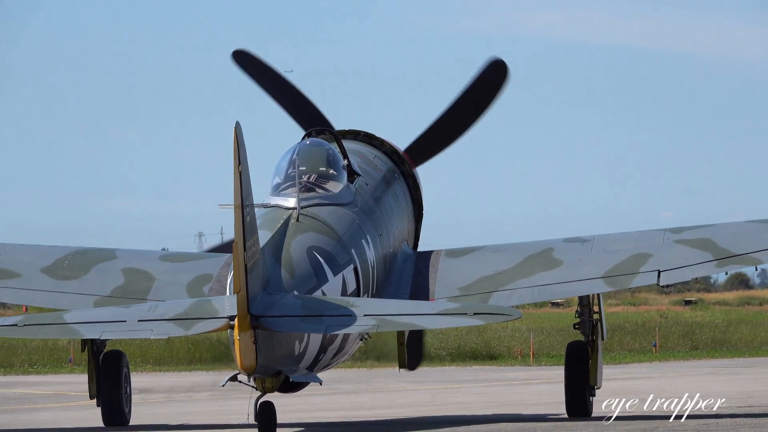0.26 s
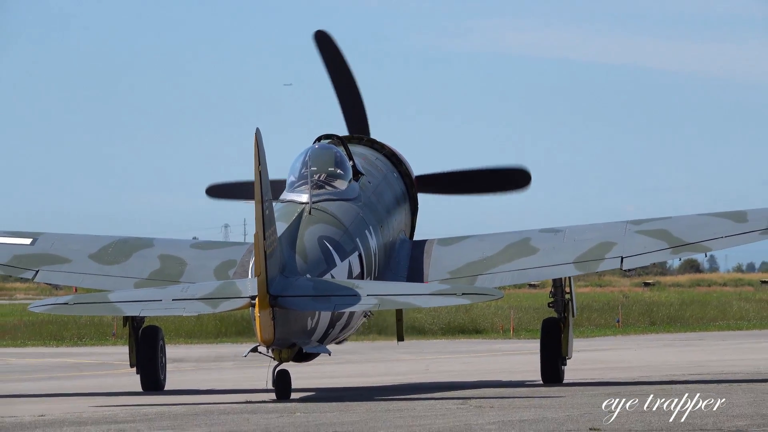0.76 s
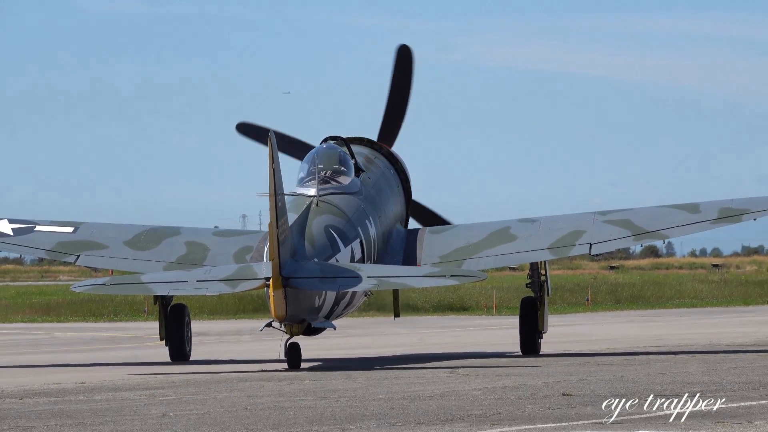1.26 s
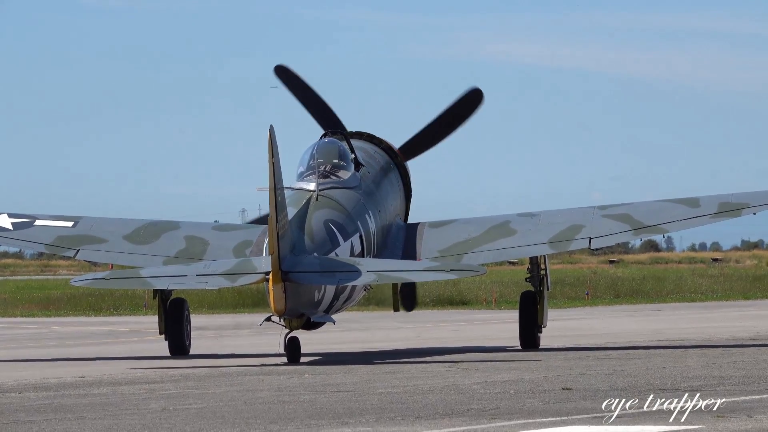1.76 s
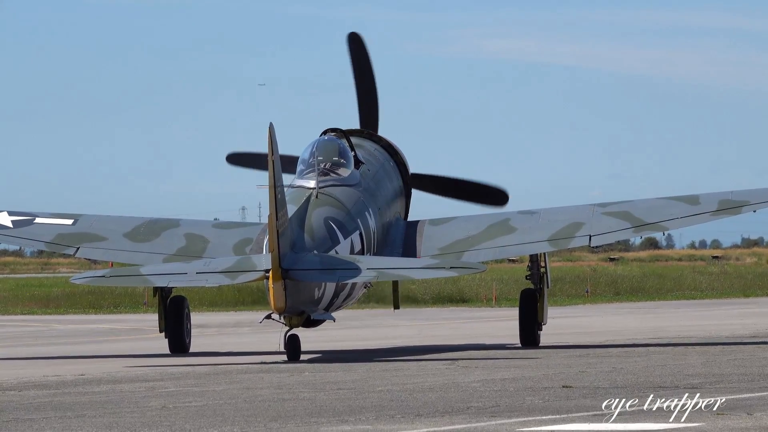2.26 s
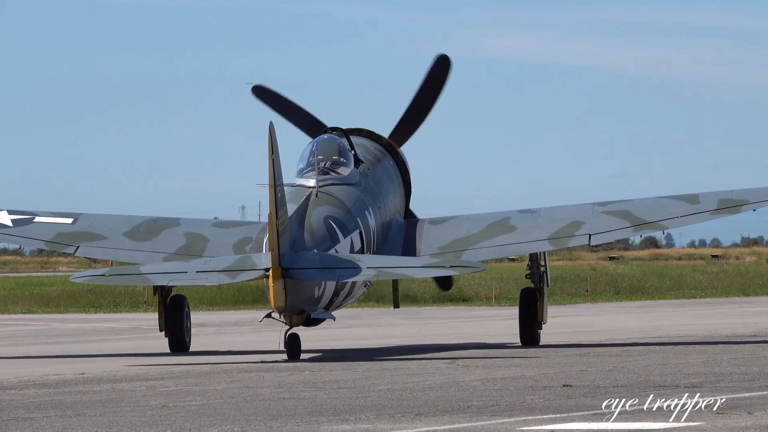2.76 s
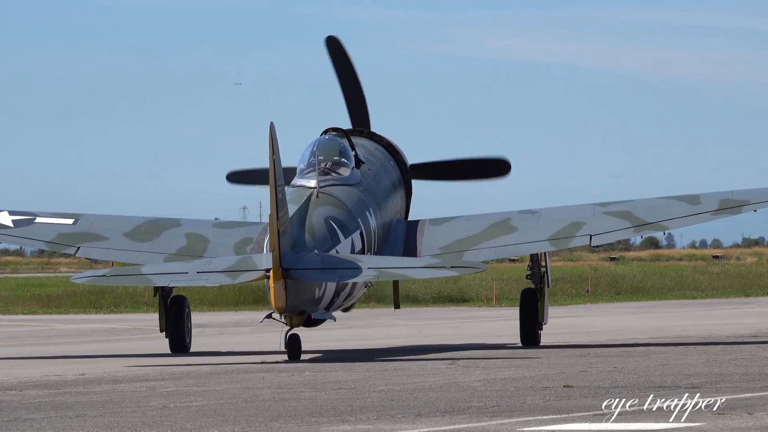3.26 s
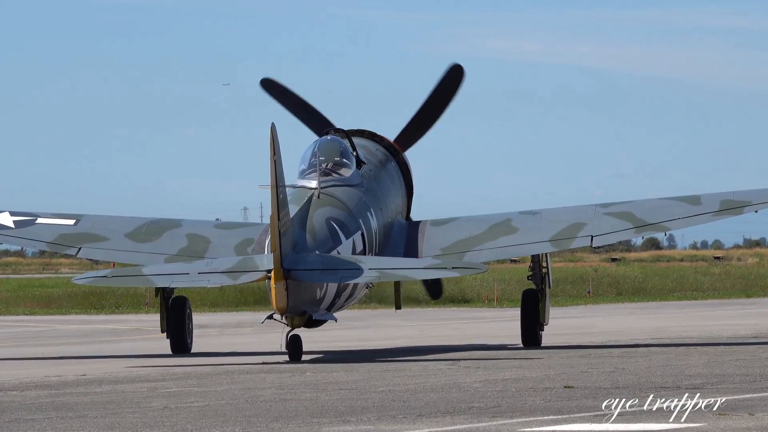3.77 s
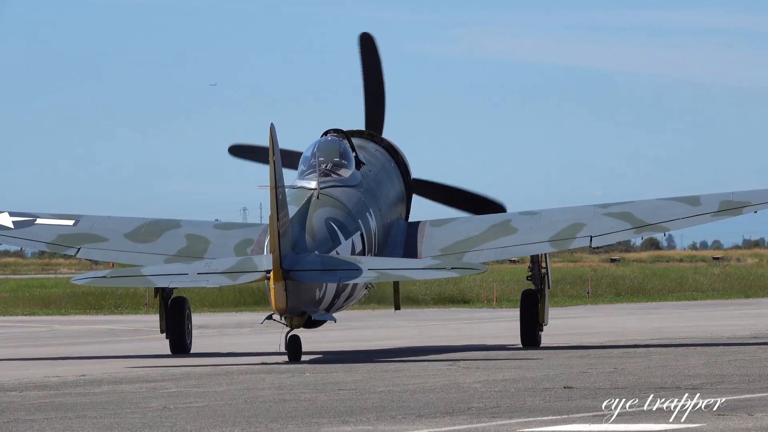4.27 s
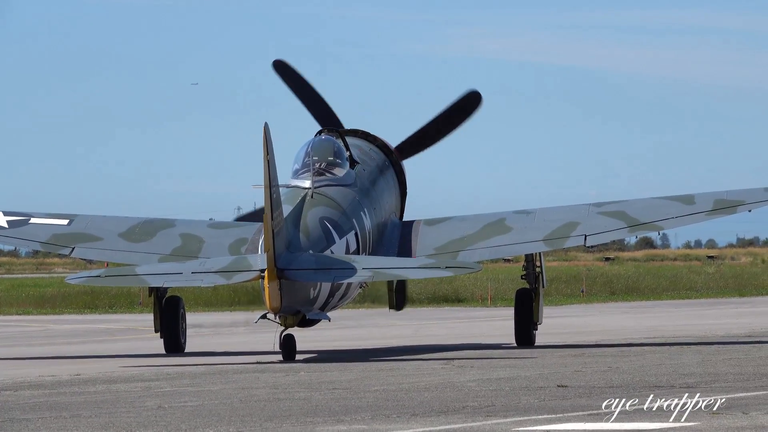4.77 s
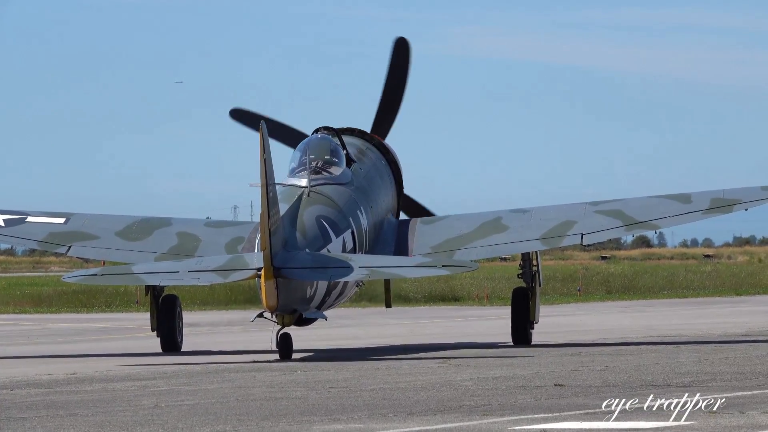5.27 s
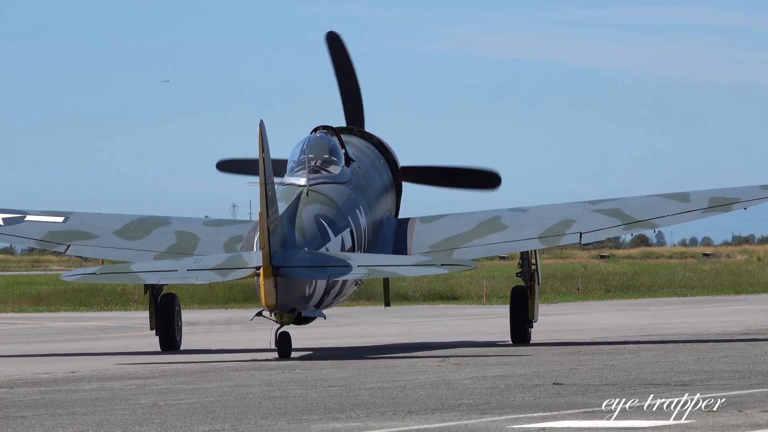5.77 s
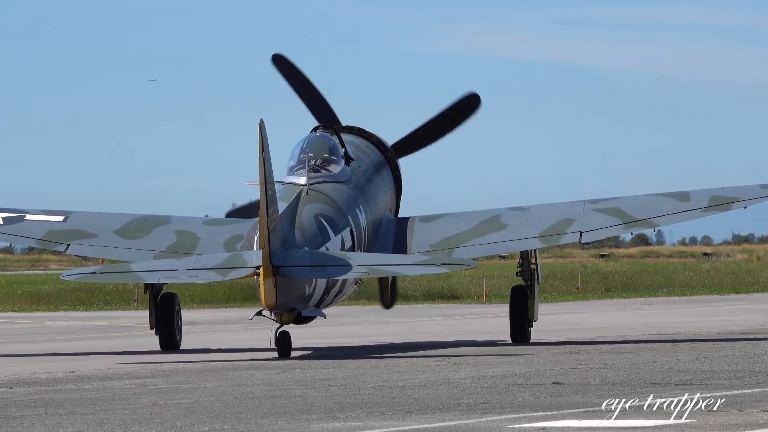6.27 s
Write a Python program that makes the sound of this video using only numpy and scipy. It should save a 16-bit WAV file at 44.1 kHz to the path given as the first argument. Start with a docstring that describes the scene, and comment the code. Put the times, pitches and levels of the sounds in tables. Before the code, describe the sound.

Two radial piston aircraft engines idle steadily on an open airfield ramp, heard from behind. One chugs hard and unevenly, each beat a crack followed by a hollow pipe thump; the other spits rapid, breathy puffs of hiss. A blurred, throbbing roar fills in below. Propeller wash buffets a nearly mono microphone with low heaves and flutter, and the strongest gusts abruptly mute everything for tiny moments.

```python
"""A hard, uneven chugging and rapid hissy puffs over a blurred roar, heavily buffeted and often cut off.
Two radial piston aircraft engines idle on an open ramp, heard from behind in the propeller wash.
One engine's firings excite the modes of its exhaust pipe; the other's spit jets of turbulent hiss.
Weaker firings form the throbbing roar, and turbulent wash presses on a near-mono microphone.
The strongest gusts pin its input and all but mute everything for a moment."""
import sys
import numpy as np
from scipy import signal
from scipy.fft import rfft, irfft, next_fast_len
from scipy.io import wavfile
from scipy.ndimage import uniform_filter1d

SR = 44100
rng = np.random.default_rng(int(sys.argv[2]) if len(sys.argv) > 2 else 0)


def generate_wav(signal):
    """Clip the signal to [-1, 1] and save it as 16-bit WAV at the path in sys.argv[1]."""
    frames = np.transpose(np.atleast_2d(signal))
    scaled = np.clip(frames, -1, 1) * 32767
    pcm = np.round(scaled).astype(np.int16)
    wavfile.write(sys.argv[1], SR, pcm)


N = 287973  # samples

# The first engine fires nine times a cycle; two firings, four and five steps apart, arrive as loud chugs,
# each a crack and then a thump. Nominal levels, before the trims of each source:
# crack_peak_s, crack_level_db, crack_ring_hz, thump_level_db, thump_ring_hz
CHUG_EVENTS = [(0.0271, -33, 1215, -32.5, 314), (0.0938, -34, 1220, -29, 303),
               (0.1786, -32.5, 809, -30, 850), (0.2473, -36, 1914, -33.5, 308),
               (0.3272, -37, 1940, -53, 303), (0.3931, -29.5, 1256, -33, 308),
               (0.4768, -36.5, 809, -27.5, 306), (0.5452, -28.5, 1930, -45, 809),
               (0.6252, -40, 800, -57, 395), (0.6923, -28.5, 2383, -27.5, 294),
               (0.7751, -34.5, 1284, -30.5, 289), (0.8435, -30, 795, -34, 306), (0.926, -36, 830, -57, 820),
               (0.9942, -32, 809, -35, 312), (1.0744, -33, 1210, -28, 296), (1.1409, -33, 2236, -29.5, 302),
               (1.2226, -32.5, 800, -48, 394), (1.2894, -30, 2680, -27, 817),
               (1.3727, -31, 1233, -23.5, 310), (1.439, -28, 2940, -32.5, 308),
               (1.5458, -49, 1680, -38, 1574), (1.668, -38.5, 1330, -26.5, 312),
               (1.7393, -32, 1290, -31, 306), (1.8221, -31, 820, -49, 820), (1.8868, -28, 825, -31.5, 303),
               (2.042, -63, 816, -33.5, 403), (2.118, -39.5, 2760, -59, 640),
               (2.1868, -34, 2733, -34.5, 399), (2.2694, -33.5, 2810, -25, 293),
               (2.3363, -33.5, 2260, -32, 820), (2.419, -35, 1290, -48, 399),
               (2.4869, -29.5, 1230, -29, 308), (2.5707, -40, 2750, -28, 292),
               (2.6402, -31.5, 1933, -39, 815), (2.7212, -39, 794, -40, 297),
               (2.788, -32.5, 840, -32.5, 308), (2.9405, -31.5, 830, -47, 830),
               (3.02, -40.5, 1950, -45, 306), (3.0898, -37.5, 3020, -32, 303),
               (3.1708, -32.5, 2800, -32, 304), (3.2385, -28.5, 1950, -30, 300),
               (3.3217, -37, 2310, -38, 300), (3.391, -32, 2980, -32.5, 297), (3.4702, -43, 3030, -32, 403),
               (3.5446, -57, 809, -37, 397), (3.6233, -33.5, 2760, -47, 399), (3.6927, -30, 2320, -40, 304),
               (3.7722, -38, 844, -60, 399), (3.8475, -39, 1280, -60, 306), (3.925, -60, 809, -30.5, 397),
               (3.994, -32.5, 2215, -31, 304), (4.0752, -34.5, 2190, -30, 397),
               (4.1433, -36.5, 2170, -60, 306), (4.2276, -32.5, 1980, -34.5, 794),
               (4.3786, -33.5, 1200, -32, 313), (4.4449, -39, 1250, -29, 832), (4.5305, -29, 803, -36, 306),
               (4.603, -38, 800, -33, 296), (4.683, -31, 809, -32, 395), (4.7497, -26.5, 3040, -24, 306),
               (4.8329, -33, 3140, -31.5, 785), (4.898, -29, 790, -26, 315), (4.9817, -33, 780, -36.5, 399),
               (5.1322, -40, 1940, -33.5, 310), (5.2035, -32, 1885, -38, 302),
               (5.284, -33.5, 1580, -32, 300), (5.3528, -30.5, 1896, -28.5, 615),
               (5.4422, -35, 823, -38, 809), (5.5037, -30.5, 1940, -30.5, 775),
               (5.5857, -34.5, 2720, -26.5, 304), (5.6549, -31, 1930, -28, 310),
               (5.7383, -36, 2000, -46, 790), (5.805, -31.5, 2360, -30.5, 410),
               (5.8885, -31, 800, -29.5, 300), (5.9575, -32.5, 2990, -31, 310),
               (6.04, -30.5, 2690, -38, 820), (6.1086, -27.5, 3050, -28.5, 399),
               (6.192, -31.5, 3040, -28, 303), (6.2627, -32, 1230, -47, 800), (6.3448, -33, 2000, -48, 395),
               (6.4167, -60, 809, -27, 870), (6.4972, -27.5, 2378, -29, 330)]
# Gusts that pin the microphone input: start_s, length_ms, swing (signed, relative, sets the ramp into the limit)
PINNING_GUSTS = [(0.0507, 1.8, 0.09), (0.0745, 9.2, -0.27), (0.1214, 4.1, 0.09), (0.1546, 2.7, -0.1),
                 (0.192, 55.3, -0.13), (0.2628, 40.8, -0.16), (0.4277, 41.8, -0.08), (0.4977, 12.0, 0.11),
                 (1.2958, 4.8, 0.07), (1.4916, 54.3, 0.22), (1.5626, 74.0, 0.45), (1.6492, 17.2, -0.19),
                 (1.7072, 3.2, -0.04), (1.9663, 80.4, -0.09), (2.7714, 12.9, 0.24), (2.842, 47.4, 0.32),
                 (2.8899, 3.4, 0.0), (2.894, 37.0, 0.0), (2.9469, 7.7, -0.28), (3.0406, 14.6, 0.09),
                 (3.1076, 15.0, -0.16), (3.1514, 11.8, 0.27), (3.2256, 5.1, 0.1), (3.5166, 36.9, -0.04),
                 (3.7737, 46.5, 0.14), (3.832, 12.3, 0.19), (3.8471, 22.9, 0.02), (3.9206, 13.9, 0.05),
                 (3.939, 12.0, 0.01), (4.091, 35.9, -0.12), (4.1473, 25.7, -0.22), (4.2101, 5.3, 0.09),
                 (4.2825, 41.7, 0.35), (4.329, 26.1, 0.05), (4.4058, 22.9, 0.1), (4.4468, 5.6, -0.22),
                 (4.4754, 13.9, -0.16), (4.4985, 19.6, -0.02), (4.5404, 28.3, 0.25), (4.5971, 2.7, -0.05),
                 (4.6966, 5.0, 0.07), (4.8487, 25.5, -0.21), (5.007, 3.8, -0.03), (5.0133, 4.4, 0.05),
                 (5.0312, 5.2, -0.03), (5.0393, 16.4, -0.01), (5.0563, 13.6, -0.01), (5.0705, 10.9, 0.01),
                 (5.371, 40.5, 0.21), (5.4294, 11.4, -0.16), (5.5478, 16.1, -0.08), (6.401, 23.0, 0.18)]
THUMP_DELAY_S = .0148  # from crack to thump


def chugs(uneven_db=4.5, away_db=2.5, ring_db=-1.5, ring_s=.005):
    """Resonance: each firing blows turbulent gas through the pipe modes and leaves one short clear ring."""
    # resonances of the exhaust pipe: centre_hz, width_hz, relative_level_db
    pipe_modes = [(298, 150, 7), (400, 186, 1.5), (679, 29, -8), (806.5, 117, 4), (1277, 600, 2.5),
                  (1680, 420, -15), (2080, 160, -3.5), (2350, 270, -2), (2630, 760, -2), (2930, 730, -13.5)]
    pipe_top_hz = 3620
    s, db, ring_hz = firings()
    uneven = uneven_db * np.clip(rng.standard_normal((len(s), len(pipe_modes))), -1.5, 1.5)
    out = np.zeros(N + 2000)
    for k, (hz, width_hz, mode_db) in enumerate(pipe_modes):
        # modes far from the firing's own ring are driven less
        octaves_away = np.log2(hz / ring_hz)
        drive_db = db + uneven[:, k] - away_db * octaves_away ** 2
        gas = rng.standard_normal(N) * bursts(s, gain_of(drive_db), rise_s=0.0053, fall_s=0.0056)
        blown = signal.lfilter(*signal.iirpeak(hz, hz / width_hz, SR), gas)
        unit_blown = blown / np.sqrt(np.pi * width_hz / SR)  # unit noise comes out at rms 1
        out[:N] += gain_of(mode_db - 7.5) * unit_blown
    t = np.arange(1500) / SR
    swell = t / ring_s * np.exp(1 - t / ring_s)  # peaks at ring_s
    for at, level_db, hz, turn in zip(s, db, ring_hz, rng.random(len(s))):
        start = max(round((at - ring_s) * SR), 0)
        ring = swell ** 2 * np.sin(2 * np.pi * (hz * t + turn))
        out[start:start + len(t)] += gain_of(level_db + ring_db) * ring
    return signal.sosfilt(signal.butter(6, pipe_top_hz, fs=SR, output="sos"), out[:N])


def firings():
    """Pulse excitation of the pipe as (s, dB, ring Hz): cracks, thumps and the faint sounds around them."""
    # faint sounds around every chug: weak firings, and the bright part of the thump:
    # delay_after_crack_s, mean_level_db, ring_hz
    faint_sounds = [(-.0167, -44.5, 1270), (.0155, -48, 2258), (.031, -53, 393)]
    faint_uneven_db = 1
    s, crack_db, crack_hz, thump_db, thump_hz = np.transpose(CHUG_EVENTS)
    uneven = faint_uneven_db * rng.standard_normal((len(s), len(faint_sounds)))
    events = [(s, crack_db, crack_hz), (s + THUMP_DELAY_S, thump_db, thump_hz)]
    for k, (delay_s, db, hz) in enumerate(faint_sounds):
        events.append((s + delay_s, db + uneven[:, k], np.full(len(s), hz)))
    return np.hstack(events)


def spits():
    """Turbulent jet noise: short hiss from the open stacks, with a faint tail off the tarmac."""
    # spectrum of a spit: frequency_hz, relative_density_db
    spit_spectrum = [(800, 0.5), (2000, 3), (3000, -0.5), (3800, 2), (4400, 5), (5400, 3.5), (7800, 3.5),
                     (9000, -5), (12000, -13.5), (15000, -25), (18000, -48)]
    split_hz = 6300
    dull_mean_db, dull_spread_db = -5.5, 9.5  # tilt of each spit: low part against high part
    s, db = jets()
    dull_db = dull_mean_db + dull_spread_db * rng.standard_normal(len(s))
    hiss = noise(spit_spectrum, patchy_db=3.5)
    dull = signal.sosfiltfilt(signal.butter(3, split_hz, fs=SR, output="sos"), hiss)
    thin = hiss - dull
    out = np.zeros(N)
    for part, level_db in ((dull, db + dull_db / 2), (thin, db - dull_db / 2)):
        jet = bursts(s, gain_of(level_db - 1.5), rise_s=0.0034, fall_s=0.0036)
        tail = bursts(s, gain_of(level_db - 22), rise_s=0.0011, fall_s=0.011)
        out += (jet + tail) * part
    return out


def jets():
    """Periodic gas release as (s, dB): second-engine firings, single spits, and hiss escaping with chugs."""
    # speed of the second engine: time_s, firing_rate_hz
    firing_rate = [(0.0, 37.15), (0.93, 37.88), (1.87, 37.85), (2.8, 37.56), (3.73, 38.25), (4.66, 38.29),
                   (5.6, 38.06), (6.53, 39.06)]
    # mean level of successive firings, every third one harder: level_db
    order_levels = [-51.5, -50.5, -46]
    # single spits, loud and soft, at nominal level: peak_s, level_db
    single_spits = [(0.043, -37.5), (0.0714, -38), (0.0975, -38), (0.418, -43), (0.657, -37.5),
                    (0.682, -35), (0.7103, -37), (0.7635, -40), (0.9575, -46), (0.9766, -43), (0.9915, -44),
                    (1.0768, -36.5), (1.1744, -30), (1.2907, -39.5), (1.3718, -42), (1.5523, -29),
                    (1.6367, -42), (1.6846, -38), (1.7936, -39.5), (1.8384, -40.5), (2.323, -44.5),
                    (2.3501, -50), (2.3944, -41.5), (2.5088, -57), (2.5626, -42), (2.5873, -43.5),
                    (2.642, -39.5), (2.696, -40.5), (2.7477, -34.5), (2.8264, -40), (2.9615, -39),
                    (2.9874, -44), (3.013, -39.5), (3.0671, -47), (3.148, -39.5), (3.2537, -41),
                    (3.3046, -42), (3.3313, -46), (3.3836, -51), (3.4364, -45), (3.461, -38.5),
                    (3.6907, -45), (3.937, -41), (4.143, -37.5), (4.247, -41), (4.3246, -37), (4.6118, -44),
                    (4.7955, -48), (4.8996, -37), (4.9133, -44), (5.1627, -46), (5.2673, -42.5),
                    (5.3526, -41), (5.4263, -43), (5.478, -33.5), (5.5087, -37.5), (5.531, -41),
                    (5.5832, -41), (5.656, -38), (5.74, -38), (5.7918, -41), (5.818, -46), (5.844, -36.5),
                    (5.8725, -42), (5.8956, -36), (5.972, -39.5), (6.051, -35), (6.0786, -40.5),
                    (6.1027, -38), (6.13, -39), (6.163, -37.5), (6.2056, -37.5), (6.3102, -44),
                    (6.3366, -43), (6.3894, -40), (6.438, -43), (6.4659, -39), (6.5174, -39)]
    start_phase, uneven_db = .384, 1.5  # phase in firings
    crack_hiss_db, thump_hiss_db = -13.5, -20  # against the level of the crack and of the thump
    fired = start_phase + np.cumsum(curve(firing_rate)) / SR
    count = np.arange(1, int(fired[-1]) + 1)
    s = np.interp(count, fired, np.arange(N) / SR)  # a firing at each whole count
    uneven = uneven_db * np.clip(rng.standard_normal(len(s)), -3, 1.2)
    db = np.take(order_levels, count % len(order_levels)) + uneven
    chug_s, crack_db, _, thump_db, _ = np.transpose(CHUG_EVENTS)
    crack_hiss = (chug_s, crack_db + crack_hiss_db)
    thump_hiss = (chug_s + THUMP_DELAY_S, thump_db + thump_hiss_db)
    return np.hstack([(s, db), np.transpose(single_spits), crack_hiss, thump_hiss])


def roar(firings_hz=59.3, lope_hz=11.0):
    """Amplitude modulation: weaker firings blur into noise that throbs at the firing and lope rates."""
    # blurred roar of both engines, before its trim: time_s, level_db
    roar_levels = [(0.0, -36), (0.36, -34.5), (1.2, -38), (1.45, -30), (1.85, -34), (2.14, -39),
                   (2.62, -35.5), (2.76, -33), (3.1, -35.5), (4.4, -34), (4.62, -29.5), (5.16, -37.5),
                   (5.91, -34.5), (6.53, -32.5)]
    # spectrum of the roar: frequency_hz, relative_density_db
    roar_spectrum = [(60, -5.5), (130, 4), (200, -8), (450, -9), (800, -15), (1300, -17), (1760, -22.5),
                     (2500, -25.5), (3100, -34), (3700, -38), (8000, -41.5), (11500, -55), (15000, -78),
                     (18000, -104)]
    t = np.arange(N) / SR
    firing_db = 0.56 * np.cos(2 * np.pi * firings_hz * t + 0.58)
    lope_db = 0.5 * np.cos(2 * np.pi * lope_hz * t + 0.21)
    level_db = curve(roar_levels) + firing_db + lope_db + 2.0
    return gain_of(level_db) * noise(roar_spectrum, patchy_db=3.0)


def wash():
    """Turbulent pressure fluctuation: slow lumpy heaves of air on the diaphragm, with quicker flutter."""
    # propeller wash, before the random lumps: time_s, heave_level_db, flutter_level_db
    wash_levels = [(0.0, -26, -29), (0.05, -19, -17), (0.16, -12.5, -25.5), (0.33, -22, -23),
                   (0.6, -20.5, -34.5), (1.2, -31, -33), (1.33, -10, -28), (1.45, -37, -35),
                   (1.6, -22.5, -28), (1.85, -16.5, -33.5), (2.12, -27.5, -32.5), (2.3, -20.5, -30),
                   (2.6, -24, -35.5), (2.7, -21, -27), (2.97, -18, -23), (3.2, -9.5, -26.5),
                   (3.45, -18, -30), (3.75, -15.5, -29), (3.9, -15.5, -17.5), (4.08, -13, -19),
                   (4.2, -22, -29), (4.3, -13, -21), (4.5, -14.5, -22), (4.67, -6, -26.5),
                   (4.85, -17, -29.5), (5.1, -30, -43), (5.4, -16.5, -22), (5.65, -19, -40),
                   (6.03, -26, -32.5), (6.17, -17, -25), (6.3, -24.5, -45), (6.53, -22, -36)]
    # spectrum of the heave: frequency_hz, relative_density_db
    heave_spectrum = [(4, 10.5), (10, -4.5), (16, 20), (25, 4.5), (45, -17), (70, -37.5), (150, -38),
                      (500, -110)]
    # spectrum of the flutter: frequency_hz, relative_density_db
    flutter_spectrum = [(25, -9), (55, 6.5), (100, -6), (160, -14.5), (300, -23), (600, -46), (1500, -110)]
    lump_db, lump_s = 2, .06  # spread and spacing of the random lumps
    t = np.arange(0, N / SR + lump_s, lump_s)
    draws = rng.standard_normal((2, len(t)))
    heave_lumps, flutter_lumps = [lump_db * np.interp(np.arange(N) / SR, t, row) for row in draws]
    heave = gain_of(curve(wash_levels) + heave_lumps) * noise(heave_spectrum, patchy_db=-0.24)
    flutter_db = curve(wash_levels, column=2) + flutter_lumps
    flutter = gain_of(flutter_db) * noise(flutter_spectrum, patchy_db=0.37)
    return heave + flutter


def bursts(s, gain, rise_s, fall_s):
    """Power addition of puffs of gas: a rounded rise to each peak and an exponential fall."""
    train = np.zeros(N)
    np.add.at(train, np.clip(np.round(s * SR).astype(int), 0, N - 1), gain ** 2)
    t = np.arange(-2000, 2001) / SR
    shape = np.where(t < 0, np.exp(-(t / rise_s) ** 2), np.exp(-abs(t) / fall_s))
    power = signal.oaconvolve(train, shape ** 2, "same")
    return np.sqrt(abs(power))


def noise(points, patchy_db):
    """Spectral shaping of random noise whose loudness drifts in small patches of time and frequency."""
    z = signal.stft(rng.standard_normal(N + 512), nperseg=512, noverlap=384)[2]
    patches = uniform_filter1d(rng.standard_normal(z.shape), size=6, axis=0)
    patches = evened(uniform_filter1d(patches, size=8, axis=1))
    x = signal.istft(z * gain_of(patchy_db * patches), nperseg=512, noverlap=384)[1][:N]
    return evened(colour(x, points))


def colour(x, points):
    """Linear filtering by a spectrum drawn on a log-frequency axis."""
    f, db = np.transpose(points)
    size = next_fast_len(N)
    hz = np.fft.rfftfreq(size, 1 / SR)
    response = gain_of(np.interp(np.log(hz + 1), np.log(f + 1), db))
    return irfft(rfft(x, size) * response, size)[:N]


def curve(rows, column=1):
    """Linear interpolation of one column of a table over time, for every sample."""
    rows = np.transpose(rows)
    return np.interp(np.arange(N) / SR, rows[0], rows[column])


def evened(x):
    """Normalisation of mean power: scales to rms 1."""
    return x / np.sqrt(np.mean(x ** 2) + 1e-20)


def gain_of(db):
    """Logarithmic level: dB to amplitude gain."""
    return 10 ** (np.asarray(db) / 20)


def pin(step, early_s):
    """Saturation: sums the steps of pressure again, held in each gap but for a faint sound near its edges."""
    # level of the faint sound within a gap, by its length (from 1 ms) and swing
    faint_db, db_per_doubling, db_per_swing = -8.5, -2.5, 30
    free, faint = np.ones(N), np.zeros(N)
    for (s, ms, swing), (a, b) in zip(PINNING_GUSTS, early_s):
        span = slice(round((s - a) * SR), round((s + ms / 1000 + b) * SR))
        free[span] = 0
        faint[span] = gain_of(faint_db + db_per_doubling * np.log2(ms) + db_per_swing * abs(swing))
    near_edge = uniform_filter1d(free, size=1000)  # the faint sound fades towards the middle of long gaps
    return np.cumsum(step * (free + faint * near_edge))


def scene():
    """Superposition of both engines and the wash, alike on both channels."""
    return np.tile(chugs() + spits() + roar() + wash(), (2, 1))


def record(dry):
    """Saturation and relaxation: gusts ramp the input to its limit, then the coupling high-pass decays."""
    # side signal against mid, before its trim: frequency_hz, relative_level_db
    side_spectrum = [(30, -42), (150, -32), (400, -40), (1000, -32), (3000, -30), (12000, -23)]
    coupling_hz, soft_limit, edge_hz = 15.7, .55, 18000  # soft_limit against full scale 1
    step, t = np.diff(dry[0], prepend=0), np.arange(N) / SR
    for s, ms, swing in PINNING_GUSTS:
        # a slope that stops dead swings the high-pass back
        slope = 3.3 * swing * 2 * np.pi * coupling_hz / SR
        step = step - slope * np.exp(-abs(t - s) / 0.0083) * (t < s)
    early_s = .00008 * rng.standard_normal((len(PINNING_GUSTS), 2))  # the channels pin a hair apart
    held = np.array([pin(step, early_s), pin(step, -early_s)])
    pair = signal.sosfilt(signal.butter(2, coupling_hz, "high", fs=SR, output="sos"), held)
    # the side signal is the same sound with unrelated phase
    z = signal.stft(colour(pair.mean(0), side_spectrum), SR, nperseg=256)[2]
    random_phase = np.exp(2j * np.pi * rng.random(z.shape))
    side = signal.istft(z * random_phase, SR, nperseg=256)[1][:N]
    pair = pair + gain_of(-8.5) * np.array([side, -side])
    pair = soft_limit * np.tanh(pair / soft_limit)  # the output stage rounds off the largest swings
    low_pass = signal.firwin(511, edge_hz, window=("kaiser", 9), fs=SR)
    return signal.oaconvolve(pair, low_pass[None], "same")


dry = scene()
out = record(dry)
generate_wav(out)
```